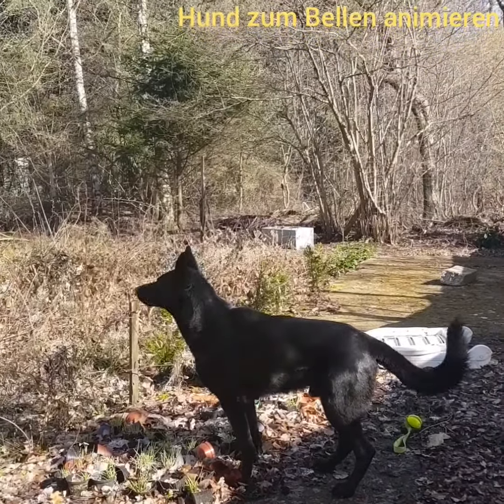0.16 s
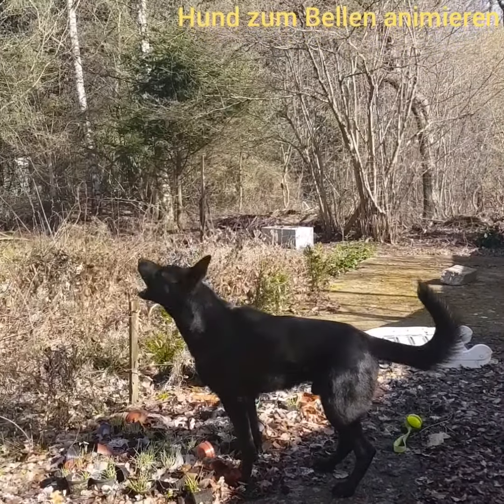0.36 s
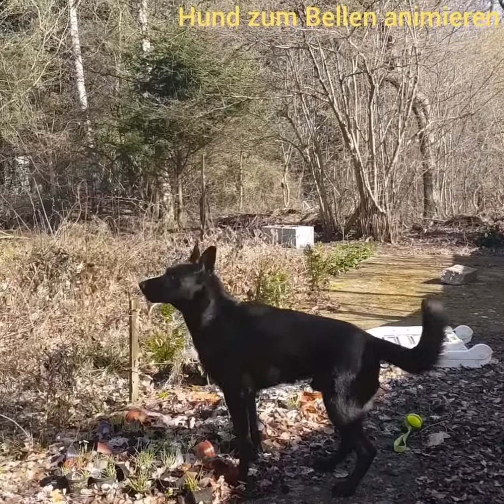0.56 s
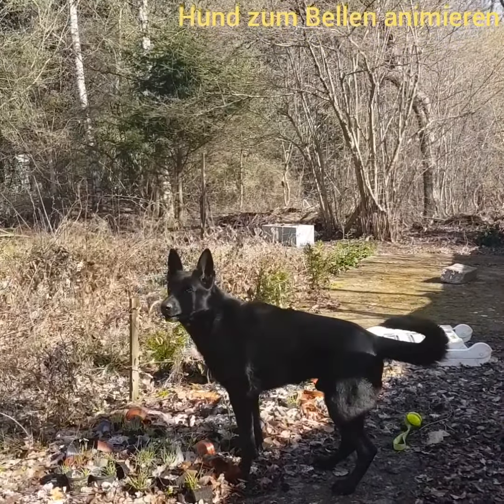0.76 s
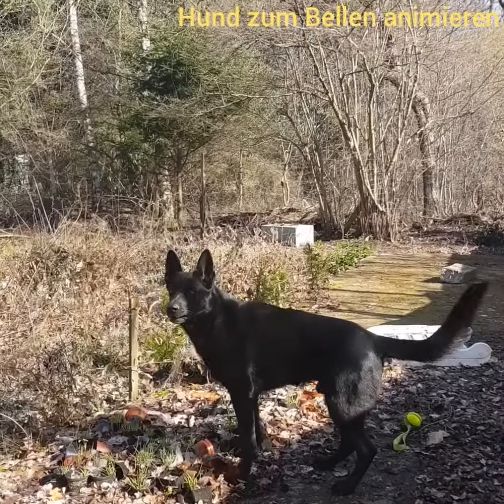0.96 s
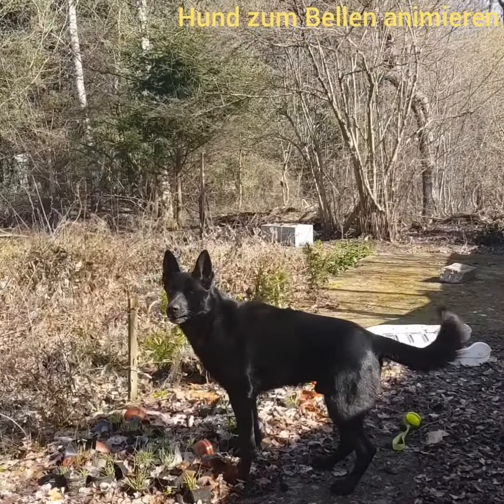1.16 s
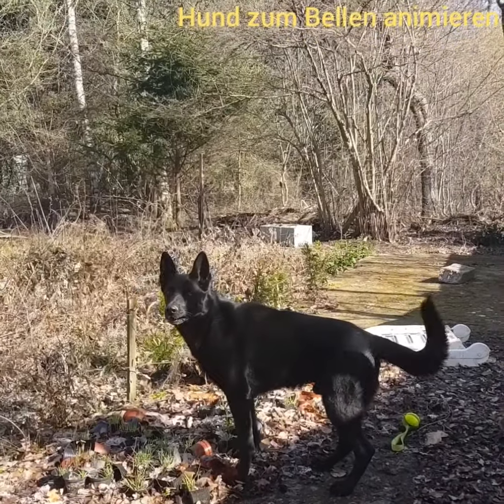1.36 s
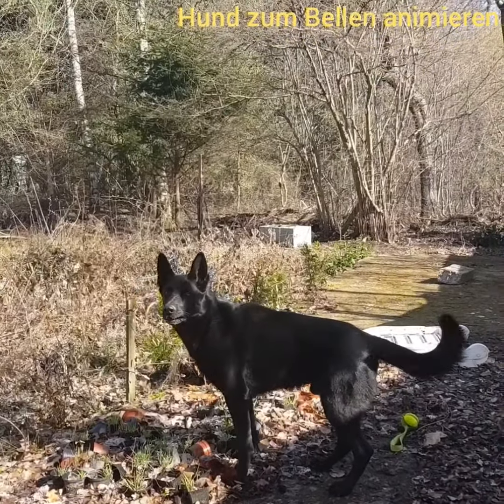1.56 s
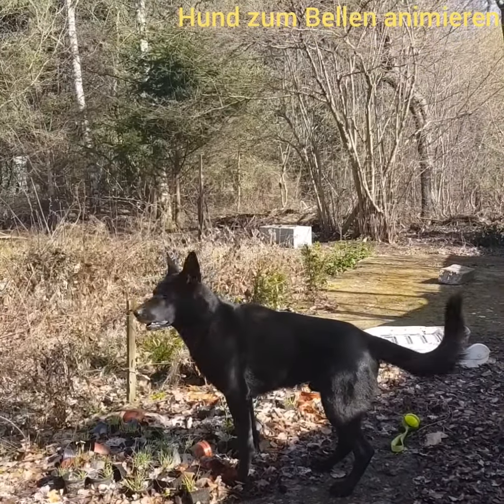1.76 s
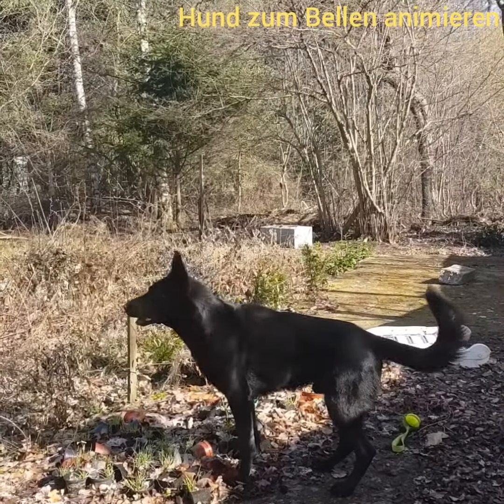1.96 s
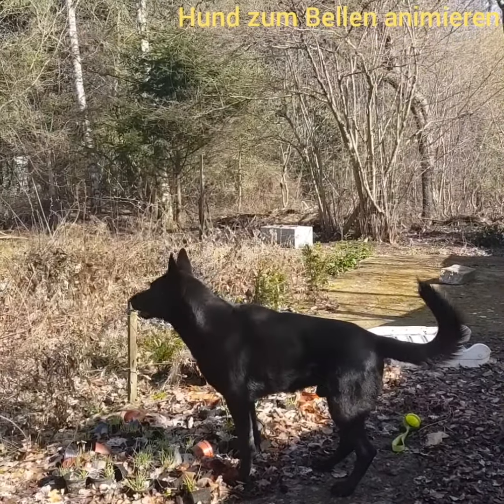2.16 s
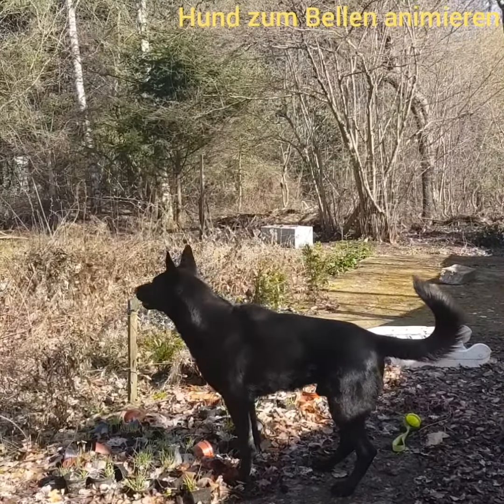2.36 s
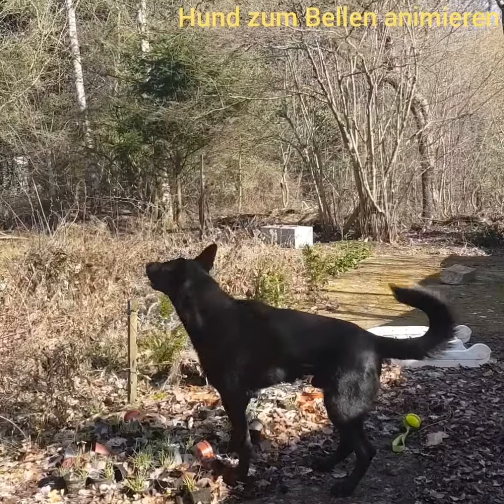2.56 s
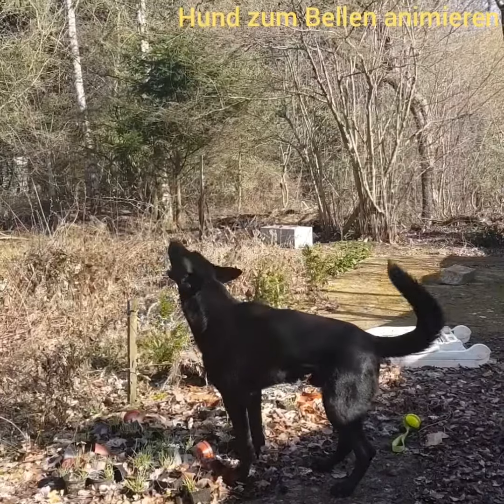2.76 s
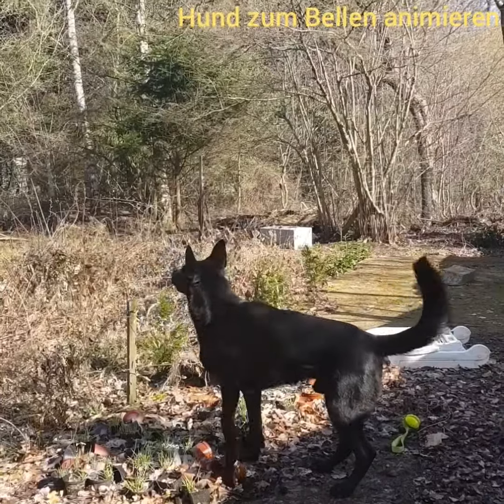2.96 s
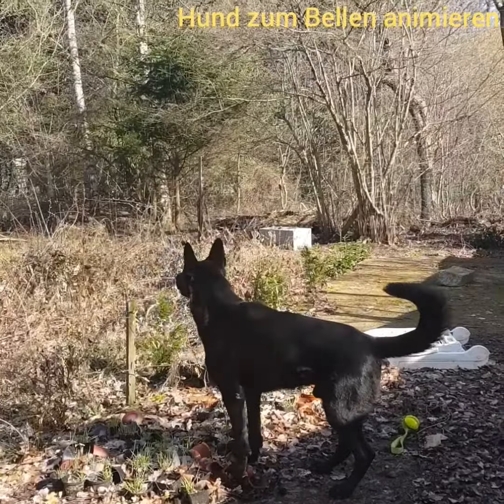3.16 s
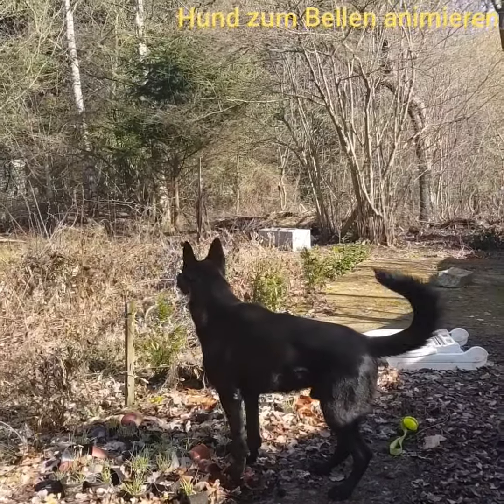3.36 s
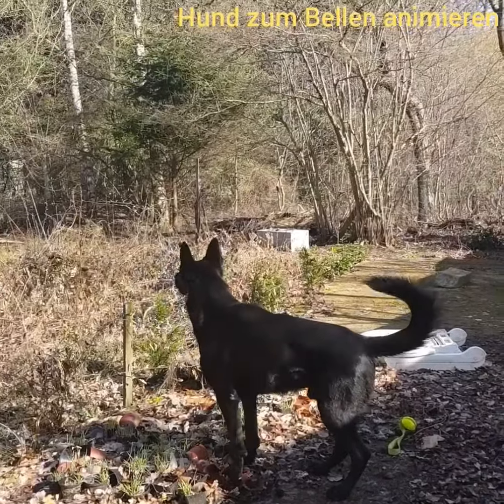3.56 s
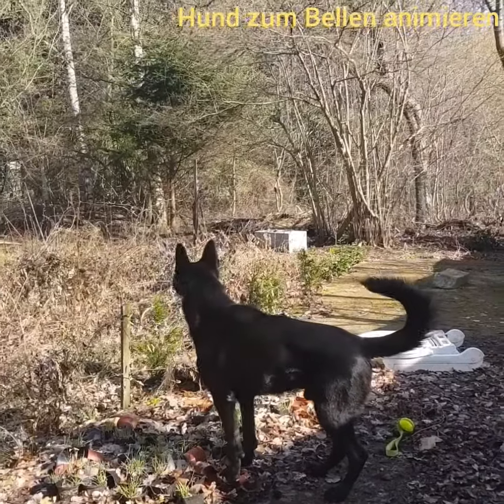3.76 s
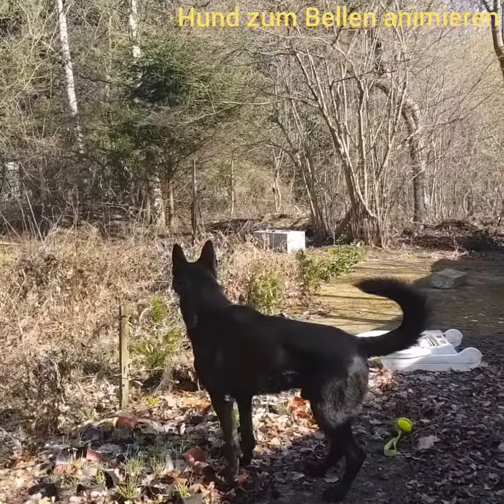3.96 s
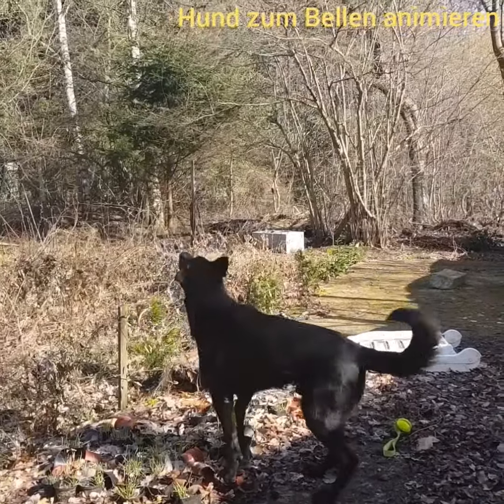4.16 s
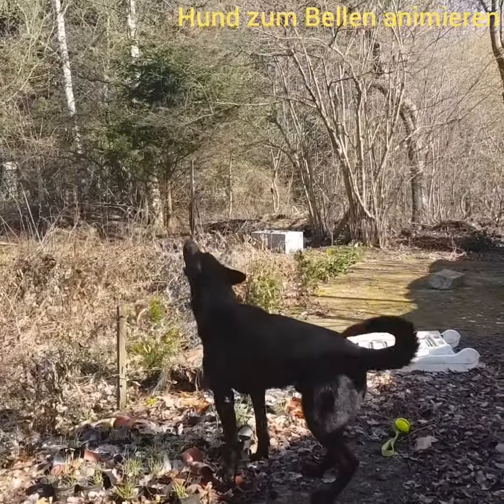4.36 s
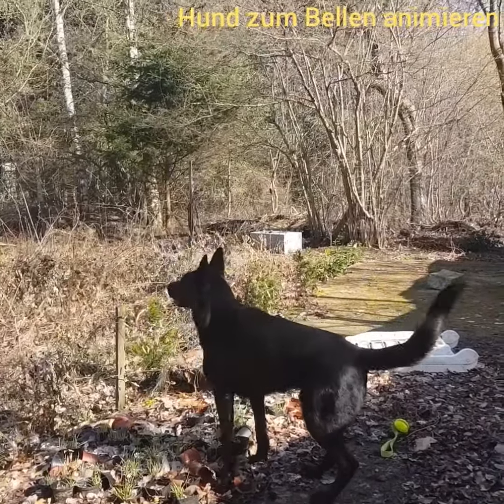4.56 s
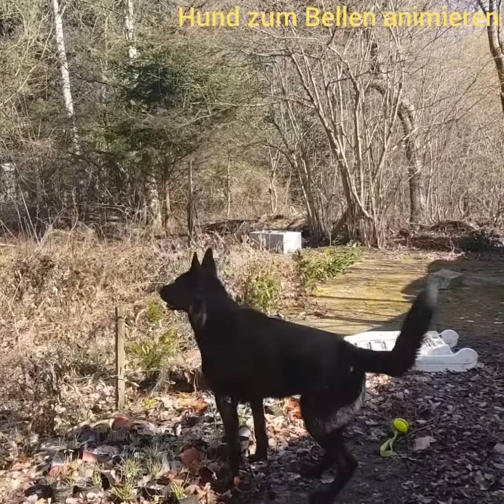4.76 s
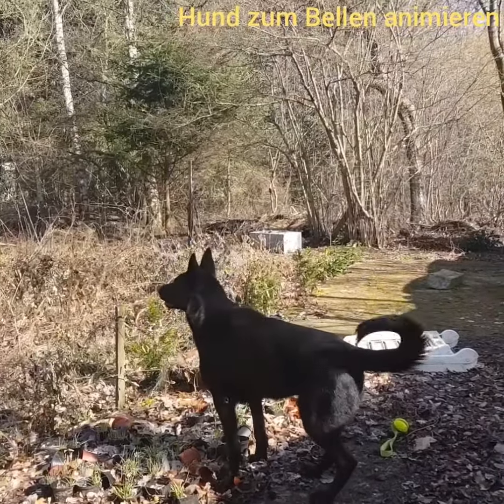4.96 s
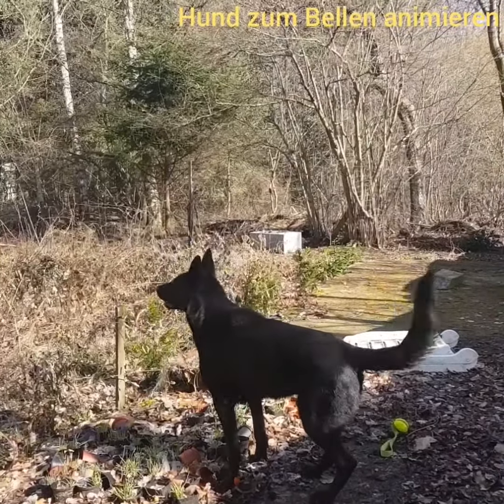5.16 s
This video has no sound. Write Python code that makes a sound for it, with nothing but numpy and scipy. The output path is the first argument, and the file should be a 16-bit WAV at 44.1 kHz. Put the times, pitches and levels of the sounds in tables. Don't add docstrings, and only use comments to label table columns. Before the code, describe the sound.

Outdoors among trees, a big dog lets out one rough bark and later two double barks, with leaves ticking and distant traffic.

```python
import sys
import numpy as np
from scipy import signal
from scipy.fft import rfft, irfft, next_fast_len
from scipy.io import wavfile
from scipy.ndimage import uniform_filter1d, minimum_filter1d

SR = 44100
rng = np.random.default_rng(int(sys.argv[2]) if len(sys.argv) > 2 else 0)


def level_to_linear(level):
    exponent = np.asarray(level, float) / 20
    return 10 ** exponent


def unload_audio(sound):
    columns = np.transpose(np.atleast_2d(sound))
    steps = np.round(np.clip(columns, -1, 1) * 32767)
    wavfile.write(sys.argv[1], SR, steps.astype(np.int16))


N = 229275
T = np.arange(N) / SR
SIDES = np.array([[1], [-1]])


def level(x):
    return x / np.sqrt(np.mean(x ** 2))


def band(x, hz, width_hz):
    return signal.lfilter(*signal.iirpeak(hz, hz / width_hz, fs=SR), x)


def steep_band(x, hz, width_hz):
    return band(band(x, hz, width_hz), hz, width_hz)


def walk(rate, size):
    hold = int(SR / rate)
    steps = np.repeat(rng.standard_normal(size // hold + 1), hold)
    return level(uniform_filter1d(uniform_filter1d(steps, hold), hold)[:size])


def on_log(hz, table):
    table_hz, value = np.transpose(table)
    return np.interp(np.log(hz + 1e-9), np.log(table_hz), value)


def wash(spectrum, swell_db, lo_hz, count):
    bass_side, flicker_db = 0.3, 0.6
    out = 0
    for hz in np.minimum(lo_hz * 2 ** (np.arange(count) / 3), .45 * SR):
        mid, side = steep_band(rng.standard_normal((2, N)), hz, hz / 3)
        gain = level_to_linear(on_log(hz, spectrum) + flicker_db * walk(3.8, N))
        spread = min(bass_side + (hz / 1500) ** 2, 1)
        out = out + gain * (mid + spread * side * SIDES)
    return level(out) * level_to_linear(swell_db)


# (time [s], traffic level [dB])
GUSTS = [(0.0, -48.5), (0.5, -44), (0.8, -51), (1.1, -51.5), (1.6, -52), (1.97, -46), (2.45, -46.5),
         (2.9, -51), (3.2, -54), (3.7, -55), (4.1, -48), (4.5, -50), (4.9, -52.5), (5.2, -53)]


def gusts():
    return np.interp(T, *np.transpose(GUSTS))


# (frequency [Hz], level [dB per Hz])
ROAD_TONE = [(15, -38), (25, -24.5), (54, -4.5), (132, -3), (157, -5), (205, -12), (366, -7), (521, -10.5),
             (711, -10), (1110, -10.5), (5000, -29), (6500, -59), (11000, -120)]


def traffic(gust_db):
    return wash(ROAD_TONE, gust_db, 29.27, count=23)


# (frequency [Hz], level [dB per Hz])
TWIG_TONE = [(1760, -30), (3000, 0), (4060, -8), (5320, -3), (7350, -3), (11700, -7), (14500, -36)]


def twigs(gust_db):
    quiet_db, per_gust = -70.5, 0.66
    swell_db = quiet_db + per_gust * (gust_db - gust_db.mean()) + 6.5
    return wash(TWIG_TONE, swell_db, 4500, count=6)


# (loudest time [s], swell [s], firing pitch then [Hz], climb [Hz per s],
# tone level [dB], rumble level [dB])
ENGINES = [
    (0.301, 0.52, 138.4, 29, -50.5, -55.5),
    (2.152, 0.32, 159.2, -39, -68.5, -52),
    (3.699, 0.51, 131, 13.5, -63.5, -65),
    (4.749, 0.53, 148.3, 16.5, -55.5, -64.5),
]


def engines():
    mid, side = steep_band(rng.standard_normal((2, N)), 41.0, 9.1)
    out = level_to_linear(-68.0) * level(mid + 0.23 * side * SIDES)
    lead = 0.25 * SIDES
    for s, swell, hz, climb, tone_db, rumble_db in ENGINES:
        wavering_hz = (hz + climb * (T - s)) * (1 + 0.012 * walk(4, N))
        phase = np.cumsum(2 * np.pi * wavering_hz / SR)
        tone = level_to_linear(tone_db + 0.92 * walk(20, N)) * np.sin(phase + .5 * lead)
        rumble = level_to_linear(rumble_db + 1.8 * walk(10, N)) * np.sin(phase / 3 + lead)
        out = out + np.sqrt(2) * (tone + rumble) * np.exp(-((T - s) / swell) ** 2)
    return out


# (frequency [Hz], level [dB])
TRACT = [(150, -25.5), (280, -42), (340, -21.5), (390, -11.5), (450, -9), (620, -9), (700, -7.5),
         (770, -20)]


def low_partials(hz, effort_db, half_db, phase, rough, hoarse):
    def wobble(depth):
        return 1 + depth * rough * walk(117.3, len(hz))

    first_db = effort_db + on_log(hz, TRACT)
    second_db = effort_db + on_log(2 * hz, TRACT)
    first = level_to_linear(first_db) * wobble(0.038) * np.cos(2 * phase)
    second = level_to_linear(second_db) * wobble(0.1) * np.sin(4 * phase)
    third_gain = .4 * hoarse ** 2 * np.clip((880 - 3 * hz) / 170, 0, 1)
    third = level_to_linear(effort_db + on_log(3 * hz, TRACT) - 7) * third_gain * wobble(.3) * np.cos(6 * phase)
    growl = level_to_linear(-36.5 + .5 * effort_db) * np.clip((216 - hz) / 40, 0, 1) * np.cos(2 * phase)
    half_line = level_to_linear(half_db) * wobble(0.27) * np.cos(3 * phase)
    doubling = np.clip(level_to_linear(half_db - np.maximum(first_db, second_db) - 12.5), 0, 1)
    return np.sqrt(2) * (first + second + third + growl + half_line), doubling


# (frequency [Hz], width [Hz], level [dB])
THROAT = [(695, 102.6, 20), (1228, 199, 1), (1863, 275, -7), (2090, 130, -15.5)]


def throat(source, hz, hoarse):
    out = 0
    for k, (f, width, db) in enumerate(THROAT):
        out = out + (-1) ** k * level_to_linear(db) * steep_band(source, f, 1.146 * width)
    glide = np.clip(np.abs(np.gradient(hz)) * SR / 3000, 0, 1)
    lips = level_to_linear(-17.0) * .4 * hoarse ** 2 * glide * source
    return out + steep_band(lips, 2260, 200)


# (frequency [Hz], width [Hz], level [dB])
TEETH = [(4584, 760, 2.5), (5530, 810, 2), (6620, 1260, -1), (9290, 3100, -6), (11000, 1600, -22),
         (3265, 2900, -6.5)]


def teeth(breath, pitch_drop, since_puff, puff_db, whistle_hz, whistle_db):
    out = 0
    for f, width, db in TEETH:
        patchy_db = db + 2.6 * walk(52, len(pitch_drop))
        out = out + level_to_linear(patchy_db) * steep_band(breath, f, 2.13 * width)
    whistle = level_to_linear(whistle_db + .06 * pitch_drop) * breath
    out = out + steep_band(whistle, whistle_hz, 450)
    puff = level_to_linear(puff_db) * np.exp(-(since_puff / 0.014) ** 2) * breath
    out = out + steep_band(puff, 5660, 1800)
    return signal.sosfilt(signal.butter(8, 12700, fs=SR, output="sos"), out)


# (pitch [Hz], roughness [0-1])
STRAIN = [(200, .45), (300, .2), (350, .16), (365, .3), (385, .6)]
# (pitch [Hz], half-pitch line [dB], throat [dB], chest [dB])
STRAIN_GAINS = [(200, -14, -9, 5.5), (258, 4, -2, 6), (328, -10.5, 0, -3), (356.3, 4.5, 2, -0.5),
                (388, -0.5, -0.5, 6.5)]


def bark(rows, colour, hoarse, whistle_hz, whistle_db):
    s, *columns = np.transpose(rows)
    t = np.arange(s[0], s[-1], 1 / SR)
    n = len(t)
    hz, effort_db = (uniform_filter1d(np.interp(t, s, c), int(0.004 * SR)) for c in columns)
    half_line_db, throat_level_db, breath_level_db, chest_level_db, puff_db = colour
    pitch, *gains = np.transpose(STRAIN_GAINS)
    half_gain, throat_gain, chest_gain = (np.interp(hz, pitch, g) for g in gains)
    pitch_drop = hz - hz.max()
    half_db = effort_db + half_line_db + half_gain
    throat_db = effort_db + throat_level_db + throat_gain
    breath_db = 0.77 * effort_db + breath_level_db + .008 * pitch_drop
    chest_db = 0.88 * effort_db + chest_level_db + chest_gain
    rough = hoarse * np.interp(hz, *np.transpose(STRAIN))
    phase = np.cumsum(np.pi * hz * (1 + 0.04 * rough * walk(150, n)) / SR)
    low, doubling = low_partials(hz, effort_db, half_db, phase, rough, hoarse)
    upper = 0
    for k in range(5, 30):
        strength = doubling if k % 2 else 1
        upper = upper + strength * (1 + rough * walk(117.3, n)) * np.cos(k * phase)
    air = rng.standard_normal((3, n)) * (1 + 0.28 * np.cos(2 * phase))
    treble = signal.butter(2, 950, "high", fs=SR, output="sos")
    leak = signal.sosfilt(treble, air[0] + 1.1 * air[1:])
    source = level_to_linear(throat_db) * (upper + 10.8 * rough * leak)
    chest = level_to_linear(chest_db - 5.5) * level(band(band(air[0], 449, 50), 449, 100))
    breath = level_to_linear(breath_db + 2.5) * (0.58 * air[0] + air[1:])
    since_puff = t - s[1] - .012
    hiss = teeth(breath, pitch_drop, since_puff, puff_db, whistle_hz, whistle_db)
    return (low + throat(source, hz, hoarse) + chest + hiss) * signal.windows.tukey(n, .08)


# (time [s], pitch [Hz], effort [dB])
BARKS = [
    [(0.38, 165.2, -40.5), (0.417, 209, -3.5), (0.436, 239.5, -1), (0.446, 324.8, 0), (0.49, 381.1, -3),
     (0.518, 350.4, -1.5), (0.545, 266.5, 0), (0.556, 231, -28), (0.61, 157, -38)],
    [(2.37, 114.6, -47), (2.45, 207, -15), (2.466, 251.2, -6.5), (2.478, 322.4, 2.5), (2.53, 388, -3),
     (2.572, 347, 0), (2.6, 263.4, -6), (2.634, 181.6, -25), (2.72, 145, -35.5)],
    [(2.71, 149.2, -36), (2.752, 204.5, -4.5), (2.774, 237.8, -1), (2.786, 333, 0), (2.823, 347, -1.5),
     (2.851, 340, -1), (2.888, 219.7, -7.5), (2.93, 140.3, -29), (3.1, 100, -54.5)],
    [(3.99, 119.8, -43.5), (4.06, 191, -26), (4.08, 252.5, -8), (4.1, 327.5, 0.5), (4.145, 384.2, 0),
     (4.182, 352.4, 1), (4.22, 254.4, -10), (4.26, 200, -26.5), (4.31, 189, -29.5)],
    [(4.3, 184.7, -29.5), (4.332, 202, -4.5), (4.354, 310.8, 0), (4.38, 336.2, 4), (4.404, 358.3, -5),
     (4.43, 348.8, 3.5), (4.46, 228.5, -6), (4.494, 192, -17.5), (4.53, 154.5, -41)],]
# (half-pitch line [dB], throat [dB], breath [dB], chest [dB], opening puff [dB])
COLOURS = [(-20, -23, -40.5, -18, -10), (-20, -25, -42, -12, 10), (-21, -27, -48, -25, 14.5),
           (-21, -29, -45, -11.5, -1), (-26, -30.5, -49, -36, 1.5)]
HOARSE = [1.6, 1.35, 1.0, 1.5, .8]
# (frequency [Hz], level over the breath [dB])
WHISTLES = [(4500, 7), (4330, 9), (4650, 10), (4400, 10), (4720, 12)]


def dog():
    out = np.zeros((2, N))
    for rows, colour, hoarse, whistle in zip(BARKS, COLOURS, HOARSE, WHISTLES):
        sound = bark(rows, colour, hoarse, *whistle)
        at = int(rows[0][0] * SR)
        out[:, at:at + sound.shape[1]] += sound
    return out


# (frequency [Hz], left ahead of right [radians])
PORT_LEAD = [(150, -.1), (450, -.22), (600, -.4), (720, -1.0), (1250, -1.1), (2000, -.4), (4500, -1.1),
             (7000, -.1)]
# (frequency [Hz], left minus right [dB])
PORT_BALANCE = [(200, -.5), (350, 3.0), (600, 1.5), (720, -.3), (950, 2.0), (1300, -1.0), (2000, .5),
                (5000, -1.0)]


def ports(x):
    size = next_fast_len(N)
    hz = np.arange(size // 2 + 1) * SR / size
    half = level_to_linear(on_log(hz, PORT_BALANCE) / 2) * np.exp(.5j * on_log(hz, PORT_LEAD))
    return irfft(rfft(x, size) * np.array([half, 1 / half]), size)[:, :N]


# (delay [s], time to fade by 60 dB [s], level [dB], centre [Hz], width [Hz])
ECHOES = [
    (.004, 0.079, -7, 2350, 9140),
    (0.028, 0.25, -28, 596, 1250),
    (0.101, 1.3, -32, 2008, 743),
    (0.148, 1.7, -60.5, 684, 30),
    (0.148, 2.1, -53.5, 751.4, 30),
    (.06, 0.39, -12.5, 7420, 6880),
]


def woods(x):
    t, out = T[:2 * SR], 0
    for delay, t60, db, hz, width_hz in ECHOES:
        fade = np.exp(-np.log(1000) * t / t60) * (1 - np.exp(-(t / delay) ** 2))
        mid, side = rng.standard_normal((2, len(t)))
        spread = mid + 1.27 * band(side, 4400.0, 6200.0) * SIDES
        scatter = band(spread, hz, width_hz) * fade
        out = out + level_to_linear(db) * scatter / np.sqrt(np.sum(scatter ** 2) / 2)
    return signal.fftconvolve(x[None], out, axes=1)[:, :N]


# (time [s], length [s], level [dB])
RUSTLES = [
    (0.604, .07, -51.5),
    (2.049, .05, -60),
    (2.636, 0.035, -62),
    (2.936, .03, -63.5),
    (3.117, 0.082, -66),
    (4.652, 0.095, -64.5),
]


def rustle():
    swell = sum(level_to_linear(db) * np.exp(-((T - s) / length) ** 2) for s, length, db in RUSTLES)
    noise = rng.standard_normal((3, N)) * level_to_linear(2.5 * walk(97, N))
    return swell * level(steep_band(.7 * noise[0] + noise[1:], 4500, 9000))


# (time [s], peak level [dB], brightness [Hz])
LEAVES = [(1.668, -51.5, 9860), (2.0497, -44.5, 7430), (3.0594, -57, 9560), (3.1594, -49.5, 10720),
          (3.483, -55, 11100), (3.904, -53, 7550), (4.5945, -42.5, 8130), (4.6404, -48.5, 7700),
          (4.7032, -49, 10060), (4.8309, -51, 7350), (4.9478, -53.5, 7460), (5.0604, -54.5, 7510),
          (5.099, -52.5, 7100)]


def leaves():
    out, t = np.zeros((2, N)), T[:2500]
    shape = (1 - np.exp(-t / 0.006)) * np.exp(-t / 0.006)
    for s, db, hz in LEAVES:
        at = int(s * SR)
        crackle = rng.standard_normal((3, len(t)))
        tick = band((crackle[0] + 0.8 * crackle[1:]) * shape, hz, 5000)
        out[:, at:at + len(t)] += level_to_linear(db + 6.0) * tick
    return out


def scene():
    gust_db = gusts()
    background = traffic(gust_db) + twigs(gust_db) + engines()
    voice = dog()
    return background + ports(voice) + woods(voice.mean(axis=0)) + rustle() + leaves()


def roll_off(x):
    return signal.sosfilt(signal.butter(12, 15020, fs=SR, output="sos"), x)


def record(dry):
    limit_db, span = -0.8, int(0.005 * SR)
    peak = np.abs(dry).max(axis=0) + 1e-9
    gain = minimum_filter1d(np.minimum(1, level_to_linear(limit_db) / peak), span)
    mix = dry * uniform_filter1d(gain, span)
    return roll_off(mix)


dry = scene()
out = record(dry)
unload_audio(out)
```